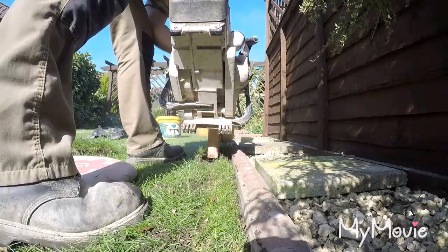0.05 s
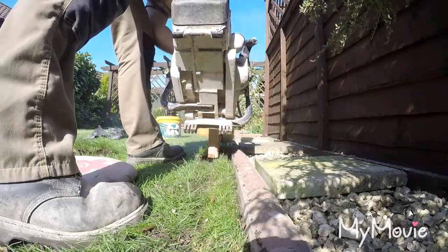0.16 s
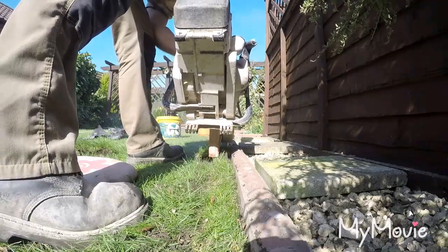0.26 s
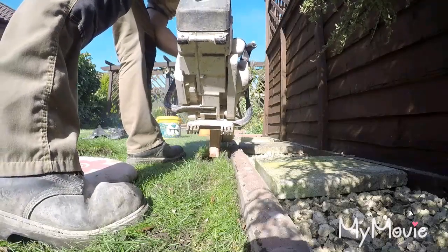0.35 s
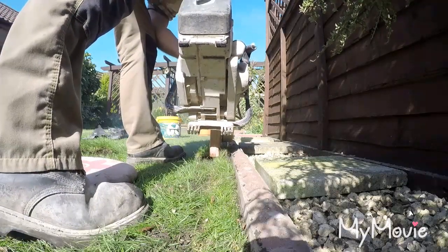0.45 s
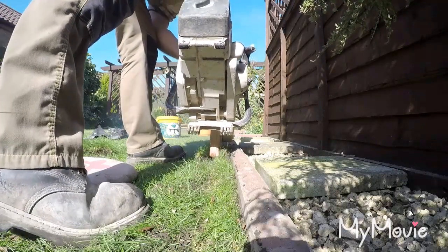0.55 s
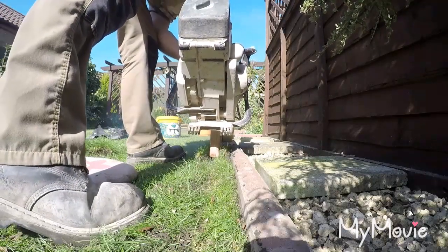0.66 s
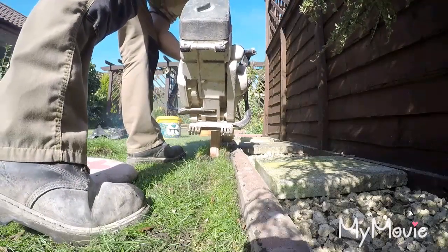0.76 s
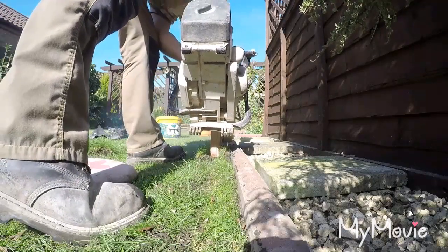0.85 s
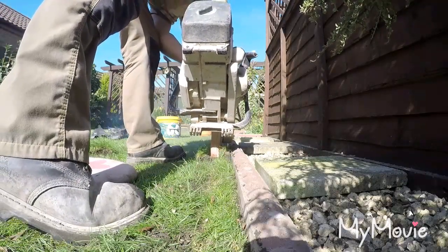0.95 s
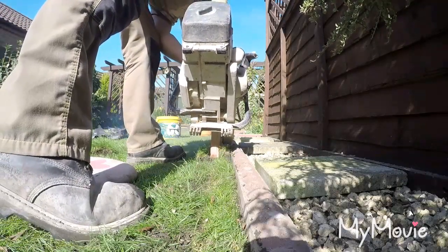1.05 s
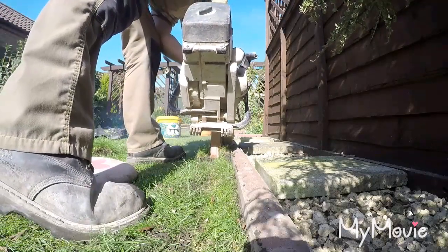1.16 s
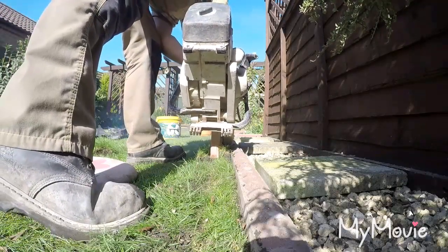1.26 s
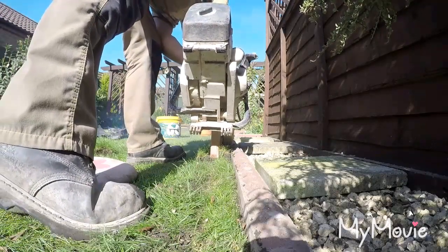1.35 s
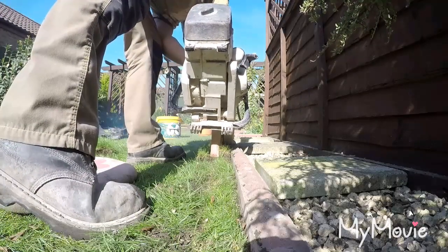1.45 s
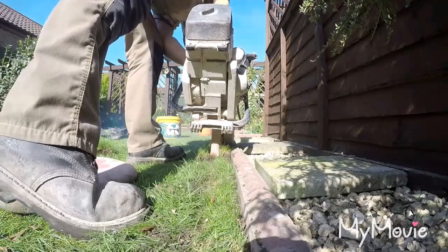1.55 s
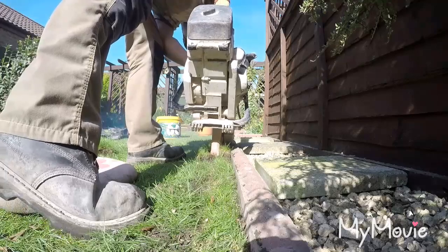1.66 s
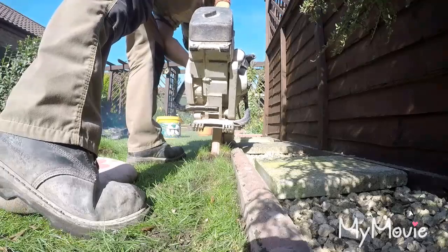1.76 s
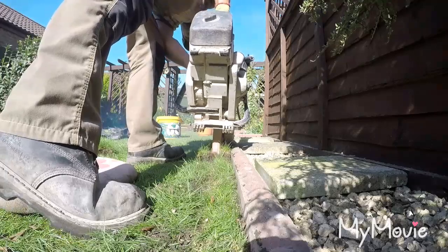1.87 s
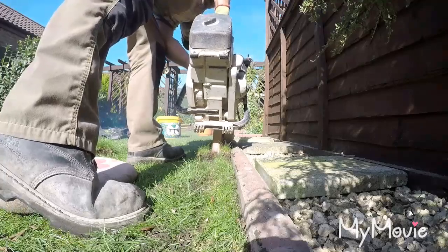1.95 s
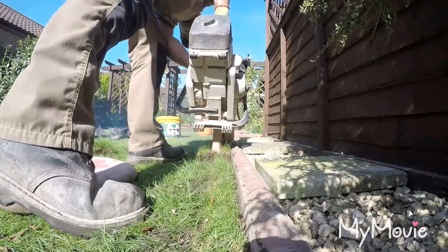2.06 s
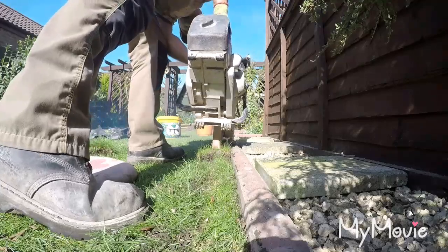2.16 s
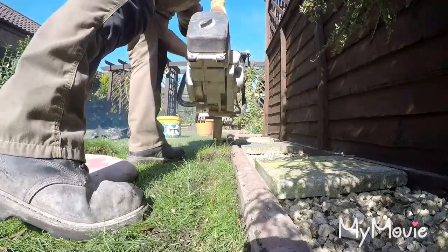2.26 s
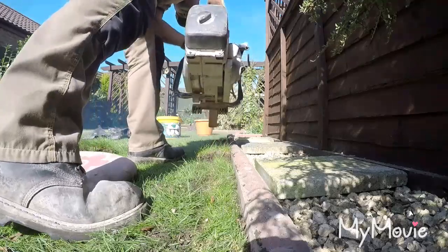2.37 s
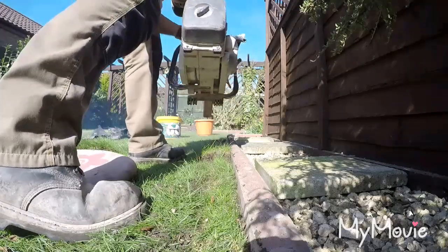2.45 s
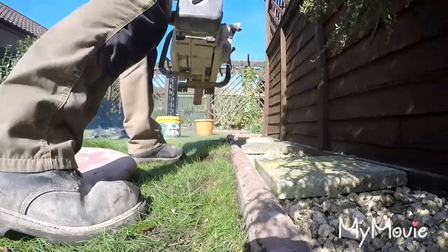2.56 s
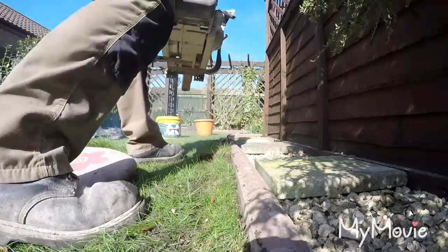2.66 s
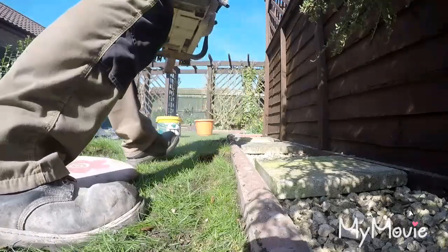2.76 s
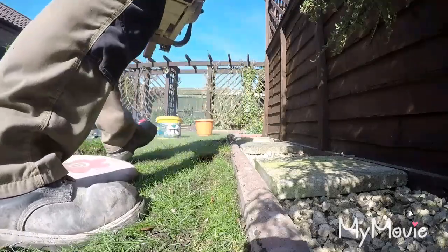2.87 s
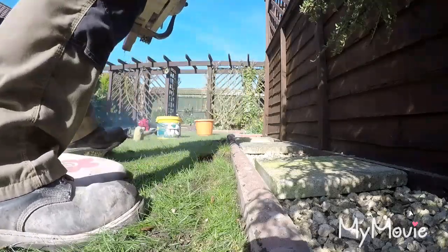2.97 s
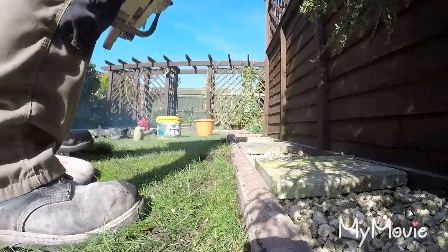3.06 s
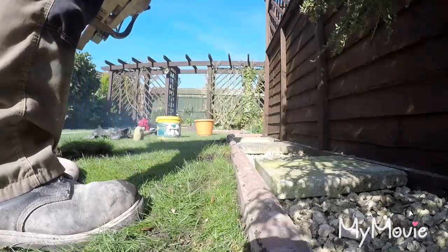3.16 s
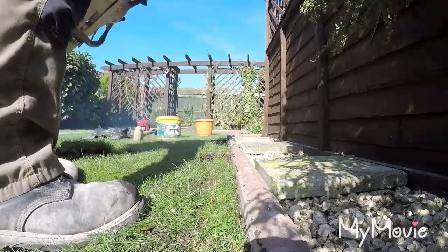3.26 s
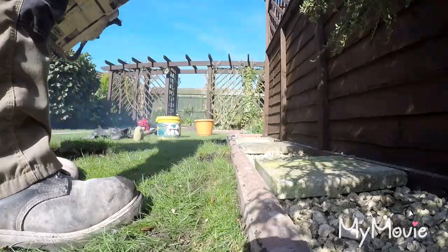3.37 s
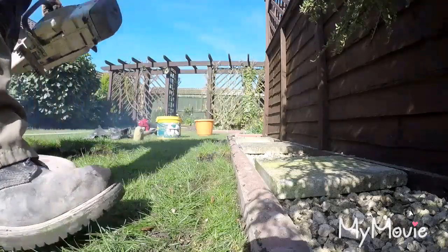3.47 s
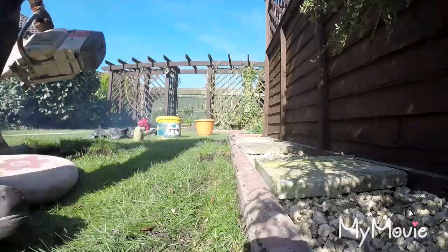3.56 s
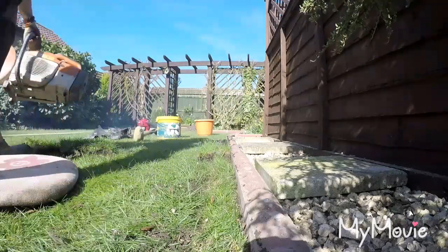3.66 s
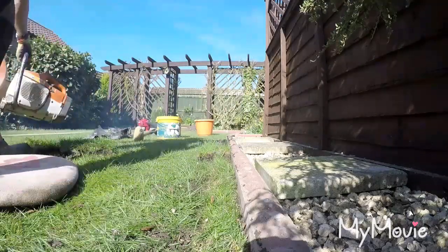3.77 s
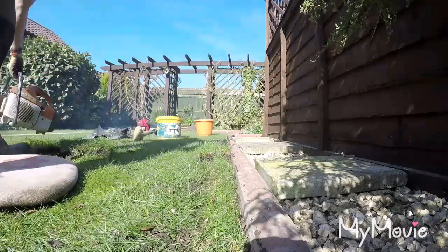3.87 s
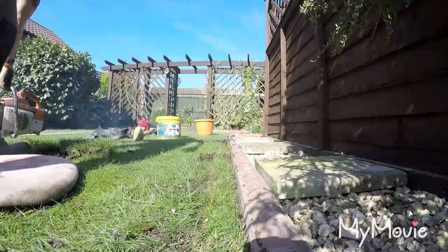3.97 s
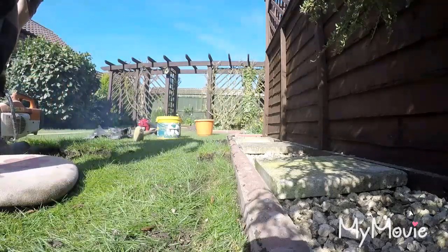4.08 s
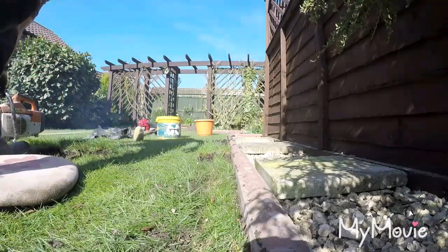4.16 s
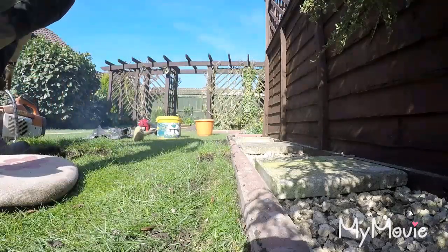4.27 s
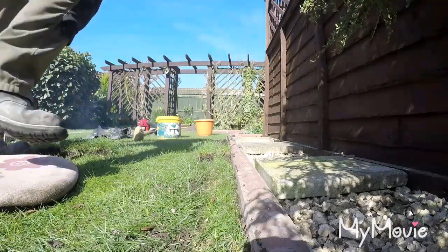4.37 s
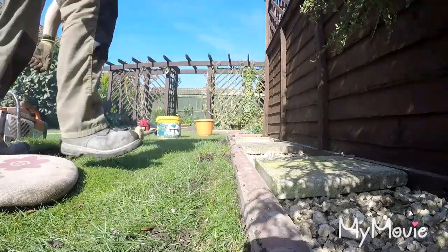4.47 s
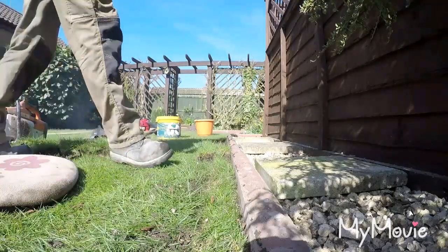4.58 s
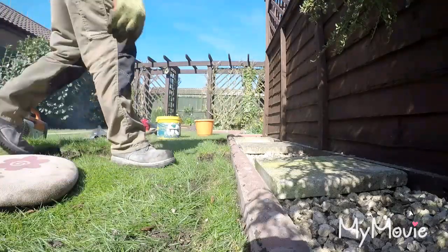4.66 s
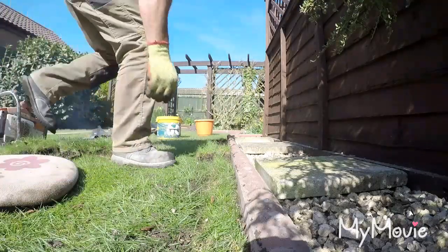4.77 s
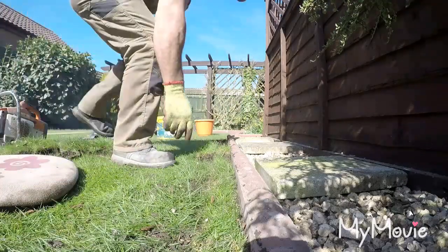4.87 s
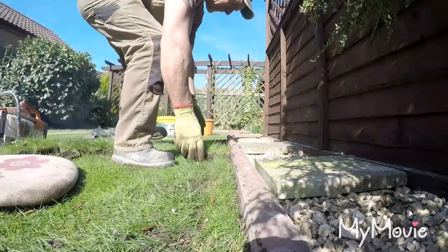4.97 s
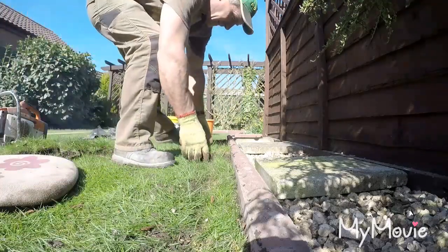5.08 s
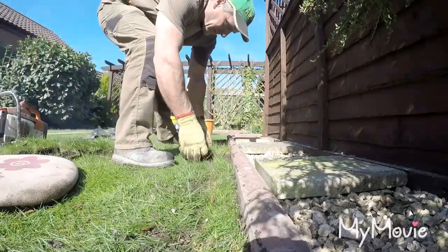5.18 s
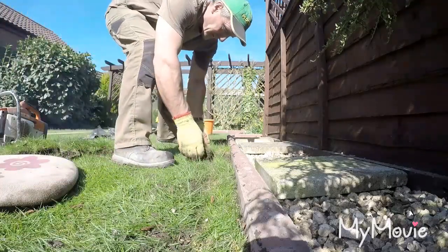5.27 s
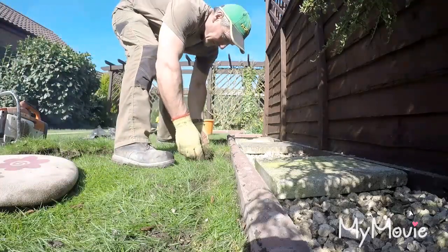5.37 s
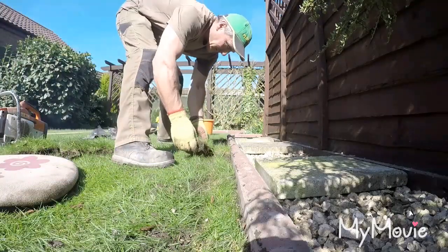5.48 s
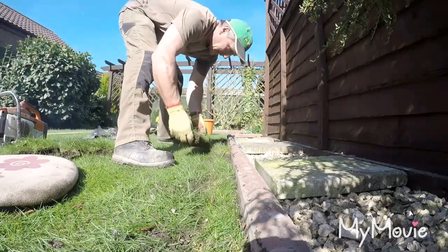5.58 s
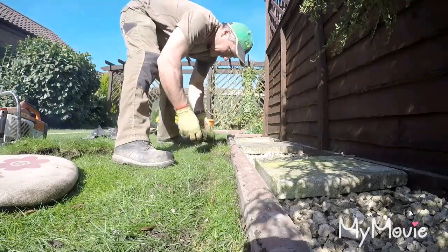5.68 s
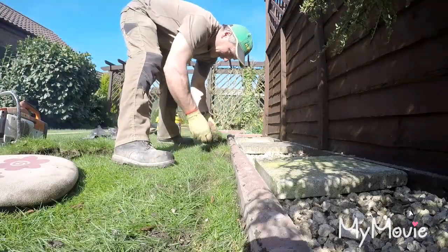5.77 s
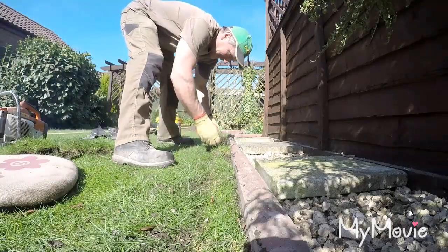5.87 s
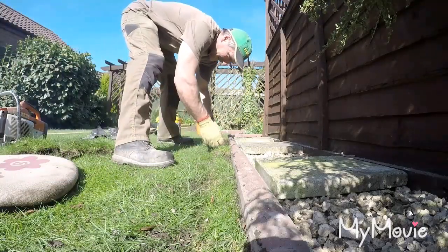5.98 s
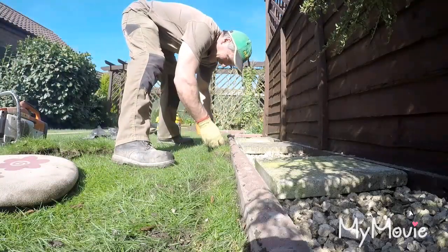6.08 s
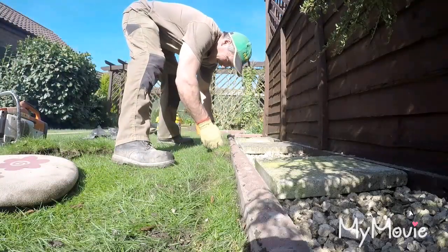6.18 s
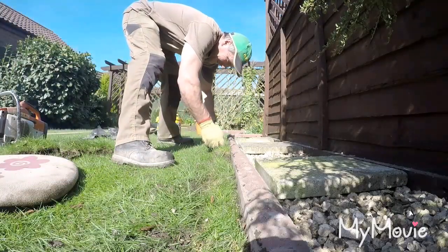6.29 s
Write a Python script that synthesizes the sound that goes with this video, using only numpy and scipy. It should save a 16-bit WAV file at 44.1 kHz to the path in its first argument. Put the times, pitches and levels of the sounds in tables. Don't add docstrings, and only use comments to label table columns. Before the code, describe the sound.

A loud, raspy petrol engine drones at high speed while a disc bites gritty concrete, eases, then bites again. The trigger is let go: firing stops, casing rattle slows and a hissy whistle falls in pitch. Two dull thuds mark it being set on grass, followed by a quieter, uneven put-put idle with metallic ticking. Dry, close outdoor microphone, faint low air.

```python
import sys
import numpy as np
from scipy import signal
from scipy.io import wavfile
from scipy.ndimage import uniform_filter1d

SR = 44100
rng = np.random.default_rng(int(sys.argv[2]) if len(sys.argv) > 2 else 0)


def gain_from_db(level_db):
    decades = np.asarray(level_db, float) / 20
    return 10 ** decades


def unload_wav(signal):
    wavfile.write(
        sys.argv[1],
        SR,
        np.round(np.clip(np.atleast_2d(signal).T, -1, 1) * 32767).astype(np.int16),
    )


N = 279153
TIME = np.arange(N) / SR

# t/s, speed/(turns per s)
CRANK_SPEED = [(0.0, 83.56), (0.13, 86.33), (0.43, 85.48), (0.6, 81.62), (0.95, 80.88), (1.21, 78.41),
               (1.5, 80.98), (1.79, 85.59), (1.96, 85.95), (2.07, 88.32), (2.14, 86.81), (2.35, 78.89),
               (2.9, 62.84), (3.05, 54.83), (3.28, 43.48), (3.48, 37.42), (3.8, 32.61)]
START_TURN = -.547
FIRING_RUNS = [
    (-1, 5, 2),
    (6, 8, 1),
    (10, 18, 2),
    (21, 25, 2),
    (26, 26, 1),
    (28, 66, 2),
    (67, 67, 1),
    (68, 166, 2),
    (169, 172, 3),
    (176, 176, 1),
]
IDLE_GAPS = [4, 8, 5, 6, 8, 4, 3, 2, 4, 3, 2, 2, 3, 4, 4, 4, 5, 4, 1, 1, 5, 4, 1, 1, 4]
KICK = .025
LET_GO_S, SET_DOWN_S, SETTLE_S = 2.127, 4.2, 0.96

# once a turn/dB, twice/dB, four times/dB, overtones/dB
CRANK_TONES = [
    (-30, -32, -43.5, -50.5),
    (-43, -37.5, -48, -49.5),
    (-45.5, -50, -49, -55.5),
]
COAST_FADE = (10, 19.4, 1.9, 5.8)
# multiple of speed, level/dB
OVERTONES = [(3, -9), (5, -6), (6, -9), (7, -11), (8, -12), (9, -13), (10, -14), (11, -16), (12, -19),
             (13, -19), (14, -17)]
# f/Hz, level/dB
FRAME = [(170, 3), (230, 9.5), (300, 3.5), (450, -3), (650, -1), (850, 1.5), (1000, 13), (1200, 17.5)]
WAVER_DB = 2

# t/s, disc pressure/dB, engine effort/dB
LOAD = [
    (0, -24.5, -29.5),
    (.2, -25, -29),
    (.25, -37.5, -28),
    (.52, -32.5, -27.5),
    (.62, -41, -28),
    (1.4, -34, -29.5),
    (1.62, -29.5, -28),
    (1.9, -28, -29),
    (2.14, -39, -28),
]
# t/s, level/dB
COAST_LEVEL = [(2.14, -36), (2.4, -35), (2.7, -40), (2.95, -35), (3.1, -37.5), (3.4, -40), (3.8, -40),
               (4.0, -39.5), (4.2, -42), (4.55, -46), (5.1, -44), (5.55, -45.5), (6.0, -45.5),
               (6.33, -43.5)]
# t/s, f/Hz, level/dB
WHINE = [
    (2.2, 2500, -35),
    (2.43, 2760, -34),
    (2.518, 2720, -31.5),
    (2.62, 2650, -34.5),
    (2.786, 2390, -34),
    (2.9, 2400, -37),
    (3.184, 2315, -40.5),
    (3.5, 2420, -56),
]
# t/s, strength/dB, jet above strength/dB
POPS = [(3.7998, -39, -33), (3.922, -30, 10), (4.121, -23.5, -2), (4.2556, -19, 0), (4.4044, -35, -8),
        (4.6415, -26.5, -6), (4.757, -26.5, 0), (4.8444, -45, 2), (4.9039, -21.5, -1), (5.0191, -27, 3.5),
        (5.1082, -47, 8), (5.1709, -40, -7), (5.2348, -29, 0), (5.327, -25.5, 0.5), (5.443, -21.5, -6),
        (5.5538, -21, -0.5), (5.6696, -18.5, -1.5), (5.8037, -14, 0), (5.896, -28.5, -19),
        (5.9289, -45, -6), (5.9574, -15.5, -4), (6.0874, -15.5, 1), (6.2, -46, 15), (6.2348, -41, -10),
        (6.2603, -31, 2.5)]
# t/s, level/dB, f/Hz, decay/s
BUMPS = [
    (3.616, -36, 132, 0.02),
    (3.698, -31, 131, 0.048),
]
# t/s, level/dB, f/Hz
CHIP = [
    (0.4995, -7, 2280),
]

# f/Hz, density/(dB per Hz)
BLOW = [(20, -16), (42, -6.5), (84, -10.5), (126, 2), (210, -2.5), (300, -8), (380, -16), (480, -9),
        (630, -22.5), (720, -19.5), (860, -10.5), (1150, -5), (1400, -23.5), (3000, -41)]
# f/Hz, density/(dB per Hz)
THUMP = [(20, -46), (60, 8.5), (150, -4), (300, -4), (500, -5), (700, -14), (1000, -32), (3000, -17)]
# f/Hz, density/(dB per Hz)
LOAD_BODY = [(400, -46), (600, -13), (700, -20), (850, -8), (1150, -4.5), (1400, -33), (1650, 4.5),
             (1870, -15.5), (2410, -1.5), (3400, -7), (3900, 2.5), (4320, -11), (5390, -17), (7000, -21)]
# f/Hz, density/(dB per Hz)
COAST_BODY = [(290, -52), (500, -10), (786, -22), (1130, -6), (1440, -40), (1740, -7), (2510, -5),
              (2860, -4), (3810, -1.5), (4310, -23), (4700, -6.5), (5370, -23), (7000, -23), (9100, -41),
              (15400, -120)]
# f/Hz, density/(dB per Hz)
IDLE_BODY = [(290, -40), (500, -6.5), (761, -23), (1140, -9.5), (1400, -25.5), (2270, -14), (2890, -15),
             (3160, -10), (3900, -13.5), (4210, -20), (5740, -21), (6270, -31), (7000, -31), (9100, -62),
             (15400, -120)]
# f/Hz, density/(dB per Hz)
HISS = [(3240, -5), (5500, 4.5), (5980, -16.5), (6510, 6.5), (7080, -1), (9860, -0.5), (12500, -2),
        (15200, -12), (15800, -27)]
# f/Hz, density/(dB per Hz)
CRACK = [(590, -19), (1000, -15), (1970, -17), (2550, -12), (2840, -9), (3080, 14), (3340, -1.5),
         (4190, 0.5), (4660, -2.5), (6300, -23), (7000, 4.5), (9100, -117.5), (15400, -120)]
# f/Hz, density/(dB per Hz)
AIR = [(11, -50), (18, -25), (43, 8), (92, 0), (157, 4), (324, -8.5), (424, -4.5), (751, -35), (845, -9.5),
       (1000, -39), (1300, -46), (2200, -120)]

# f/Hz, width/Hz, level/dB
LOAD_MODES = [(1690, 56, -0.5), (2517, 12, 8.5), (3260, 88, 6.5), (3874, 240, 9), (4550, 100, 9),
              (4720, 10, -17), (4980, 42, 8), (5770, 12, -40)]
# f/Hz, width/Hz, level/dB
COAST_MODES = [(1190, 106, 11.5), (1651, 83, 15), (2340, 46, 15), (2670, 24, 4.5), (3150, 100, 9),
               (3880, 160, 13.5), (4730, 140, 2), (5560, 55, 3)]
# f/Hz, width/Hz, level/dB
IDLE_MODES = [(1165, 35, -4.5), (2610, 230, -20), (3174, 13, 6.5), (3770, 200, -4.5), (4770, 140, -8.5),
              (5200, 31, -22), (5740, 50, -12.5), (6100, 46, -48), (6340, 64, -27), (6450, 42, -33)]
# f/Hz, width/Hz, level/dB
HISS_MODES = [(6320, 6, 3.5), (7050, 10, -3.5), (6900, 51, 41), (7600, 30, -36), (9600, 29, -12),
              (10580, 7.8, 10), (12540, 28, 12.5), (13200, 190, -6)]
# f/Hz, width/Hz, level/dB
SHELL = [(464, 36, -13), (884, 53, 1.5), (1155, 37, 2.5), (1637, 20, -4.5), (2400, 130, 1.5),
         (3860, 91, -1.5)]
# f/Hz, width/Hz, level/dB
POP_MODES = [(2650, 110, -6), (3160, 120, 1.5), (3580, 74, -1.5), (4640, 130, -4), (5600, 140, -21)]
# f/Hz, width/Hz, level/dB
SCREECH = [(3260, 51, -4.5), (3586, 14, 1.5), (4780, 23, -1.5), (5290, 39, -7.5), (5520, 77, -12.5),
           (3970, 72, -7), (8300, 200, -18.5)]

BLOW_DB, JET_DB, JET_PER_PRESSURE, SHELL_DB = -4.5, -6.5, 0.39, -10
COAST_JET_DB, IDLE_JET_DB, COAST_PUFF_DB, IDLE_PUFF_DB, REV_DB = -18, -12.5, -13.5, -8.5, 9.5
THUMP_DB, THUMP_SLOPE = -34.5, 0.63
GUARD_DB, GUARD_FLUTTER_DB, CLUTCH_S, CLUTCH_DB = -36.5, 1, 3.03, 5
AIR_DB = -45


def evened(x):
    return x / np.sqrt(np.mean(x ** 2) + 1e-20)


def curves(rows):
    s, *columns = np.transpose(rows)
    return [np.interp(TIME, s, c) for c in columns]


def ramp(start_s, length_s):
    return np.clip((TIME - start_s) / length_s, 0, 1)


def waver(size):
    once = uniform_filter1d(rng.standard_normal(N), size=size)
    return evened(uniform_filter1d(once, size=size))


def uneven(marks, spread_db):
    return marks * gain_from_db(spread_db * rng.standard_normal(N))


def colour(x, points):
    hz, db = np.transpose(points)
    f = abs(np.fft.fftfreq(8192, 1 / SR))
    log_gain = np.log(gain_from_db(np.interp(np.log(f + 1), np.log(hz + 1), db, right=-80)))
    taps = np.fft.ifft(np.exp(np.conj(signal.hilbert(log_gain)))).real[:4096]
    return signal.oaconvolve(x, taps / np.linalg.norm(taps))[:len(x)]


def ring(x, hz, width_hz):
    r = np.exp(-np.pi * width_hz / SR)
    return signal.lfilter([1 - r, 0, r - 1], [1, -2 * r * np.cos(2 * np.pi * hz / SR), r * r], x)


def resonate(x, hz, width_hz):
    carrier = np.exp(2j * np.pi * np.cumsum(hz * np.ones(len(x))) / SR)
    r = np.exp(-np.pi * width_hz / SR)
    return 2 * (carrier * signal.lfilter([1 - r], [1, -r], x / carrier)).real


def swell(train, rise_s, fall_s):
    t = TIME[:SR // 8]
    burst = (1 - np.exp(-t / rise_s)) * np.exp(-t / fall_s)
    return abs(signal.oaconvolve(train, burst)[:N])


def rattle(grain_db):
    grain = uniform_filter1d(rng.standard_normal(N), size=12) * np.sqrt(12)
    return evened(rng.standard_normal(N) * gain_from_db(grain_db * grain))


def casing(shake, turns, modes, body, share, uneven_db):
    rings, knocks = 0, shake * rattle(2.8)
    for hz, width_hz, db in modes:
        luck = np.interp(turns + rng.random(), np.arange(-2, 500), rng.standard_normal(502))
        mode = evened(ring(knocks * gain_from_db(uneven_db * luck), hz, width_hz))
        rings = rings + gain_from_db(db) * np.sqrt(width_hz) * mode
    broad = evened(colour(shake * rattle(2.5), body))
    return evened(share * evened(rings) + broad)


def crank():
    driven = START_TURN + np.cumsum(curves(CRANK_SPEED)[0]) / SR
    s = np.transpose(POPS)[0] + 75 / SR
    step = np.interp(TIME, np.append(s, s[-1] + .11), np.arange(len(s) + 1))
    gap, u = step.astype(int), step % 1
    ahead = np.array(IDLE_GAPS)[gap]
    idle = np.cumsum(IDLE_GAPS)[gap] - ahead + ahead * (u + KICK * ahead * u * (1 - u))
    first = np.round(driven[round(s[0] * SR)])
    return np.where(TIME < s[0], np.minimum(driven, first - 1e-6), first + idle)


def hum(turns, speed):
    driven, coasting, idling = np.array(CRANK_TONES)[:, :, None]
    coasting = coasting + np.array(COAST_FADE)[:, None] * np.log2(speed / 86)
    free, down = ramp(LET_GO_S - .04, 0.052), ramp(SET_DOWN_S, SETTLE_S)
    levels_db = (1 - free) * driven + free * ((1 - down) * coasting + down * idling)
    levels_db = levels_db + WAVER_DB * ramp(3.6, 0.61) * np.array([waver(size=2000) for _ in levels_db])
    first, second, fourth = gain_from_db(levels_db[:3])
    tones = first * np.cos(2 * np.pi * (turns + 0.26))
    tones += second * np.cos(2 * np.pi * (2 * turns - .35))
    tones += fourth * np.cos(2 * np.pi * (4 * turns - .4))
    blurred = turns + .0025 * evened(uniform_filter1d(rng.standard_normal(N), size=900))
    for k, db in OVERTONES:
        passed_db = np.interp(k * speed, *np.transpose(FRAME))
        tones += gain_from_db(levels_db[3] + db + passed_db) * np.cos(2 * np.pi * (k * blurred - .42))
    return np.sqrt(2) * tones


def loaded(turns, marks):
    firing_turns = np.concatenate([np.arange(a, b + 1, step) for a, b, step in FIRING_RUNS])
    fires = uneven(marks * np.isin(np.floor(turns), firing_turns), 1.)
    pressure_db, effort_db = curves(LOAD)
    hiss_db = JET_DB + JET_PER_PRESSURE * (pressure_db + 26)
    blow = colour(np.roll(fires, -60), BLOW)
    on = np.clip((2.15 - TIME) / 0.023, 0, 1)
    early = np.roll(uneven(fires, 1.6), -130)
    shake = on * (swell(early, .0015, .007) + .1 * swell(marks, .002, .006) + .11)
    body = casing(shake, turns, LOAD_MODES, LOAD_BODY, share=.9, uneven_db=4.)
    jet = on * (swell(early, .001, .007) + .15)
    hiss = casing(jet, turns, HISS_MODES, HISS[:-1], share=0.2, uneven_db=5.0)
    shell = sum(gain_from_db(db) * evened(ring(early, hz, width_hz)) for hz, width_hz, db in SHELL)
    body = body + gain_from_db(SHELL_DB) * evened(shell)
    part = np.sqrt(np.mean(on))
    blow_gain = gain_from_db(effort_db + BLOW_DB + 2.5)
    return part * (blow_gain * evened(blow) + gain_from_db(effort_db) * (body + gain_from_db(hiss_db) * hiss))


def unloaded(turns, marks, speed):
    on = ramp(2.13, 0.007)
    settled = ramp(4.3, 0.2)
    knocks = uneven(marks, 1.62)
    shake = swell(np.roll(knocks, -100), 0.0022, 0.018) + 0.12
    rev_db = REV_DB * ramp(3.8, 0.076) * (1 - 0.68 * settled) * np.log2(speed / 36)
    casing_db = curves(COAST_LEVEL)[0] + rev_db
    hiss_db = casing_db + COAST_JET_DB + (IDLE_JET_DB - COAST_JET_DB) * settled
    puff_db = casing_db + COAST_PUFF_DB + (IDLE_PUFF_DB - COAST_PUFF_DB) * settled
    coasting = casing(shake, turns, COAST_MODES, COAST_BODY, share=.9, uneven_db=3.2)
    idling = casing(shake, turns, IDLE_MODES, IDLE_BODY, share=1.05, uneven_db=5.)
    body = np.sqrt(1 - settled) * coasting + np.sqrt(settled) * idling
    hiss = casing(shake, turns, HISS_MODES, HISS[:-1], share=0.68, uneven_db=3.0)
    hiss = signal.lfilter(*signal.butter(2, 12000, fs=SR), hiss)
    turned = np.interp(TIME, [3.05, 3.4, 4.25, 4.5], [0.17, 0.65, 0.65, 0.14])
    body -= turned * signal.sosfiltfilt(signal.butter(4, 1800, fs=SR, output="sos"), body)
    puffs = ramp(3.1, 0.59) * evened(colour(uneven(marks, 0.55), THUMP))
    return on * (gain_from_db(casing_db) * body + gain_from_db(hiss_db) * hiss + gain_from_db(puff_db - 7.0) * puffs)


def pops(turns):
    crack, thump, jet = np.zeros((3, N))
    for s, db, jet_db in POPS:
        at = round(s * SR)
        crack[at] = gain_from_db(db)
        thump[at + 75] = gain_from_db(THUMP_DB + THUMP_SLOPE * (db + 25.5))
        jet[at + 30] = gain_from_db(db + jet_db)
    squeeze = 0.068 * swell(np.roll(crack, -330), 0.0049, 0.0097)
    burst = squeeze + swell(crack, 0.0021, 0.0016) + .2 * swell(crack, 0.004, 0.015)
    burst = burst * rattle(2.5)
    luck = gain_from_db(1.9 * rng.standard_normal((5, 500)))[:, turns.astype(int) // 3]
    rings = sum(gain_from_db(db) * ring(burst * size, hz, width_hz)
                for (hz, width_hz, db), size in zip(POP_MODES, luck))
    leak = 0.06 * swell(np.roll(jet, -360), 0.0048, 0.0048)
    spray = leak + swell(jet, 0.0043, 0.0026) + 0.06 * swell(jet, .002, 0.011)
    spray = spray * rattle(2.2)
    rebound = uniform_filter1d(np.roll(thump, 395), size=60)
    low = colour(thump + 0.51 * rebound, THUMP)
    return gain_from_db(-3) * colour(burst, CRACK) + gain_from_db(16.5) * rings + gain_from_db(24.0) * low + gain_from_db(-2.5) * colour(spray, HISS)


def bite(turns):
    on = np.clip((2.14 - TIME) / 0.018, 0, 1)
    pressure_db = curves(LOAD)[0]
    return on * gain_from_db(pressure_db) * casing(1, turns / 2, SCREECH, LOAD_BODY, share=1.5, uneven_db=3.5)


def whine():
    hz, db = curves(WHINE)
    clutch_db = CLUTCH_DB * np.exp(-((TIME - CLUTCH_S) / 0.13) ** 2)
    guard_db = GUARD_DB + GUARD_FLUTTER_DB * waver(size=2500) + clutch_db
    on = np.clip(np.minimum(TIME - 2.2, 3.5 - TIME) / 0.23, 0, 1)
    whistle = evened(resonate(resonate(rattle(2.5), hz, 290), hz, 300))
    guard_modes = [(3600, 39), (3830, 60), (4000, 17)]  # f/Hz, width/Hz
    guard = evened(sum(ring(rattle(4.4), f_hz, width_hz) for f_hz, width_hz in guard_modes))
    return on * (gain_from_db(db - 2.5) * whistle + gain_from_db(guard_db - 6) * guard)


def bumps():
    out = 0
    for s, db, hz, decay_s in BUMPS:
        u = np.maximum(TIME - s, 0) / decay_s
        out = out + gain_from_db(db) * np.sin(2 * np.pi * hz * decay_s * u) * 2 * u * np.exp(1 - 2 * u)
    return out


def chip():
    (s, db, hz), = CHIP
    t = np.maximum(TIME - s, 0)
    return gain_from_db(db) * np.sin(2 * np.pi * hz * t) * (t / 0.0018) * np.exp(1 - t / 0.00097)


def garden_air():
    grounded = ramp(3.3, .5)
    level_db = AIR_DB + 2 - 3.67 * (2.5 - grounded)
    return gain_from_db(level_db) * evened(colour(rng.standard_normal(N), AIR))


def scene():
    turns = crank()
    speed = uniform_filter1d(np.gradient(turns) * SR, size=900)
    marks = np.diff(np.floor(turns), prepend=np.floor(turns[0]))
    engine = hum(turns, speed) + loaded(turns, marks) + unloaded(turns, marks, speed) + pops(turns)
    disc = bite(turns) + whine()
    knocks = bumps() + chip()
    return (engine + disc + knocks + garden_air())[None]


def roll_off(x):
    return signal.sosfilt(signal.butter(12, 15980, fs=SR, output="sos"), x)


def record(dry):
    heard = signal.sosfilt(signal.butter(N=10, Wn=15000, fs=SR, output="sos"), dry)
    return roll_off(heard)


dry = scene()
out = record(dry)
unload_wav(out)
```